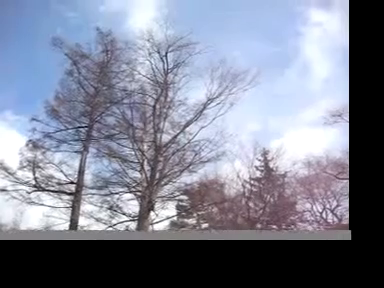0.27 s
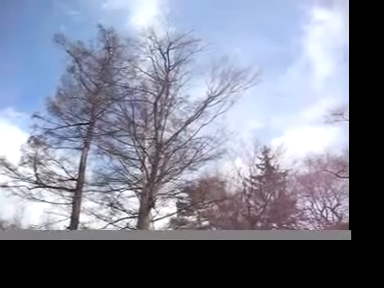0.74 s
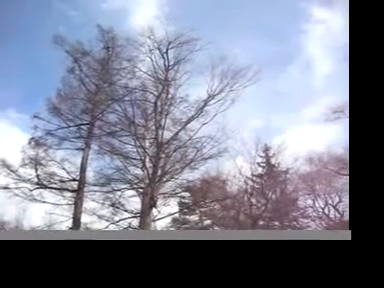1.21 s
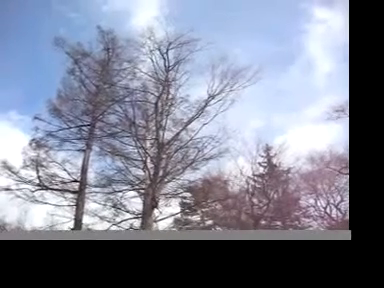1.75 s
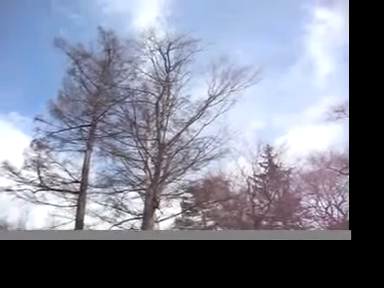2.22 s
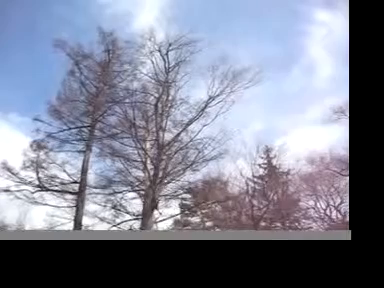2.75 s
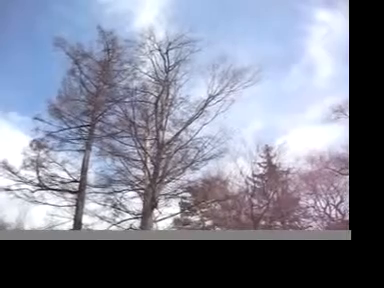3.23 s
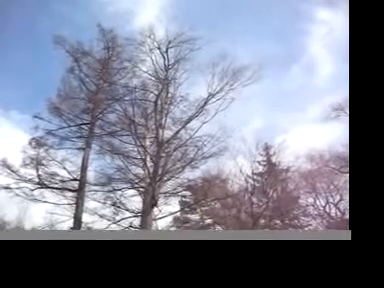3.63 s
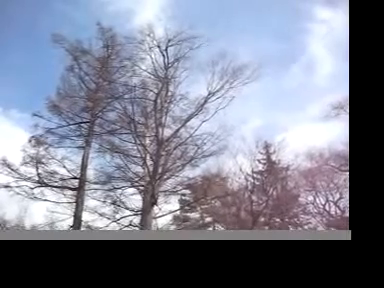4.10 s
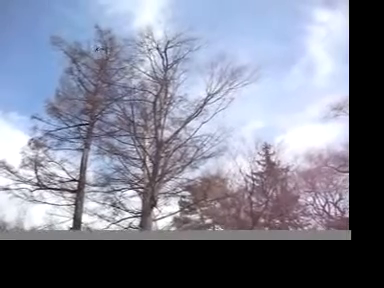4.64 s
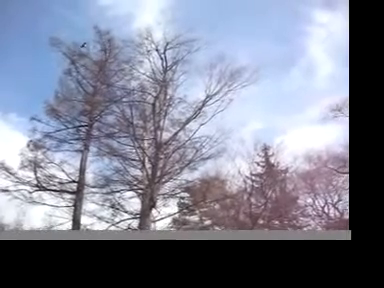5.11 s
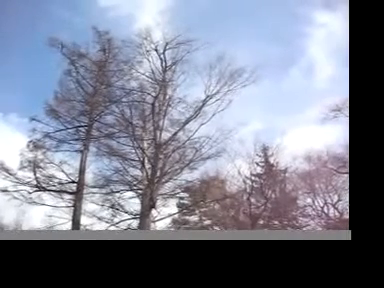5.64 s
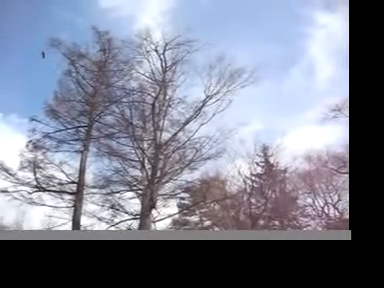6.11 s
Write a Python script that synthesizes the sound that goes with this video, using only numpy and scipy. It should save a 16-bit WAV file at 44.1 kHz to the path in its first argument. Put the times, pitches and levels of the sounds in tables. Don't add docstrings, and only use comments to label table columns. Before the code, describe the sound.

A bird of prey gives a rising whistle that slides down into a quickening, wavering trill, amid wind thumps and small birds chirping in far trees.

```python
import sys
import numpy as np
from scipy import signal
from scipy.fft import rfft, irfft, next_fast_len
from scipy.io import wavfile
from scipy.ndimage import uniform_filter1d

SR = 44100
rng = np.random.default_rng(int(sys.argv[2]) if len(sys.argv) > 2 else 0)


def nominal_scale(level):
    x = np.asarray(level, float) / 20
    return 10 ** x


def inscribe(sig):
    pcm = np.round(np.clip(np.atleast_2d(sig).T, -1, 1) * 32767)
    wavfile.write(sys.argv[1], SR, pcm.astype(np.int16))


N = 280784


def evened(x):
    return x / np.sqrt(np.mean(x ** 2) + 1e-20)


def read(points, hz):
    point_hz, value = np.transpose(points)
    return np.interp(np.log(hz + 1), np.log(point_hz + 1), value)


def curve(points):
    return np.interp(np.arange(N) / SR, *np.transpose(points))


def colour(x, points):
    size = next_fast_len(N + 4096)
    gain = nominal_scale(read(points, np.fft.rfftfreq(size, 1 / SR)))
    return irfft(rfft(x, size) * gain, size)[:N]


def coloured_noise(points):
    return evened(colour(rng.standard_normal(N), points))


def add(mix, s, sound):
    part = mix[round(s * SR):][:len(sound)]
    part += sound[:len(part)]


def flutter(count, smooth_s):
    span = max(int(smooth_s * SR), 2)
    rough = rng.standard_normal(count)
    return evened(uniform_filter1d(uniform_filter1d(rough, span), span))


def swells(rest_db, rows):
    t = np.arange(N) / SR
    power = sum(nominal_scale(db) ** 2 * np.exp(-((t - s) / width) ** 2) for s, width, db in rows)
    return np.sqrt(nominal_scale(rest_db) ** 2 + power)


# (time [s], level [dB])
TOWN_LEVEL = [(0, -48), (.7, -45.5), (2.4, -43.5), (3.3, -45), (6.37, -45)]
# (frequency [Hz], level [dB])
TOWN_SPECTRUM = [(60, 2), (200, 5.5), (480, .5), (990, -.5), (1400, -6.5), (1940, -10.5), (3000, -10.5),
                 (4900, -14)]


def town():
    level_db = curve(TOWN_LEVEL) + 5.5 + 0.36 * flutter(N, 0.22)
    return coloured_noise(TOWN_SPECTRUM) * nominal_scale(level_db)


def whine():
    whine_hz, frame_hz, whine_db = 2773.9, 30.1, -52.5
    t = np.arange(N) / SR
    frame = 2 * np.pi * frame_hz * t
    tug = .7 * np.sin(frame) + .3 * np.sin(2 * frame) + .15 * np.sin(3 * frame)
    level = np.sqrt(2) * nominal_scale(whine_db) * (1 - .22 * np.cos(frame))
    return level * np.sin(2 * np.pi * whine_hz * t + tug)


# (time [s], peak level [dB], frequency [Hz])
COVER_FLAPS = [
    (.533, -15.5, 169),
    (2.864, -21.5, 193),
    (3.328, -17, 216),
    (3.395, -16.5, 184),
]


def flaps():
    t = np.arange(N) / SR
    out = np.zeros(N)
    for s, db, hz in COVER_FLAPS:
        bell = np.exp(-((t - s) * hz / 1.04) ** 2)
        out += nominal_scale(db) * bell * np.sin(2 * np.pi * hz * (t - s))
    return out


def puff(db, hz, lean):
    cycles = np.arange(-1500, 1500) / SR * hz
    swing = np.exp(-(cycles / .58) ** 2) * np.sin(lean - 2 * np.pi * cycles)
    snap = np.exp(-(cycles / 0.26) ** 2) * np.sin(lean - 2 * np.pi * 2.12 * cycles)
    shove = np.exp(-(cycles / 1.6) ** 2) * np.sin(lean - 2 * np.pi * 0.53 * cycles)
    snap_db = -11 + .5 * (db + 19.5)
    return nominal_scale(db - 3.0) * (swing + nominal_scale(snap_db) * snap + nominal_scale(-11.5) * shove)


# (time [s], peak level [dB], frequency [Hz])
WIND_PUFFS = [(.344, -23.5, 86), (.389, -17, 98), (.41, -26, 69), (.494, -24, 79), (.541, -10.5, 95),
              (.569, -18.5, 110), (.816, -23.5, 95), (.995, -23.5, 96), (1.153, -21.5, 76),
              (1.239, -20.5, 86), (1.291, -16, 81.5), (1.312, -19, 119), (1.632, -21.5, 97),
              (2.819, -18, 97), (2.863, -20.5, 165), (2.925, -17, 74.4), (3.04, -20, 86), (3.134, -25, 98),
              (3.28, -15.5, 131), (3.297, -17, 130), (3.322, -18, 110), (3.34, -20, 89.7),
              (3.36, -26, 68.6), (3.386, -15.5, 100), (3.425, -20.5, 65), (3.477, -21.4, 79),
              (3.492, -15, 85), (3.517, -17, 94), (3.581, -16.5, 107), (4.292, -23, 79)]
# (time of peak [s], half width [s], level [dB])
WIND_GUSTS = [
    (.47, 0.18, -34.5),
    (1.15, 0.49, -40),
    (1.65, 0.11, -37.5),
    (2.9, 0.31, -34),
    (3.45, 0.12, -32),
    (4.15, 0.16, -41.5),
]
# (frequency [Hz], level [dB])
WIND_SPECTRUM = [(15, -31), (30, -8), (70, 1.5), (100, -4.5), (135, -5), (200, -13.5), (320, -26.5),
                 (600, -78)]


def wind():
    lumps = swells(-40.5, WIND_GUSTS) * nominal_scale(1.3 * flutter(N, 0.033))
    out = coloured_noise(WIND_SPECTRUM) * lumps + flaps()
    leans = rng.uniform(0.088, 1.42, len(WIND_PUFFS))
    for (s, db, hz), lean in zip(WIND_PUFFS, leans):
        add(out, s - 1500 / SR, puff(db, hz, lean))
    return .36 * np.tanh(out / .36)


# (time of peak [s], half width [s], level [dB])
FLOCK_SWELLS = [
    (.62, .08, -58),
    (.84, 0.088, -52.5),
    (1.3, .1, -52),
    (1.65, 0.19, -53.5),
    (3.3, 0.69, -61.5),
    (4.45, 0.28, -62),
    (4.9, 0.094, -52),
    (5.6, .15, -64),
]
# (frequency [Hz], level [dB])
FLOCK_SPECTRUM = [(3000, -41), (3800, -8), (4400, -2), (4900, -4), (5300, -7), (6000, -37)]


def flock():
    return coloured_noise(FLOCK_SPECTRUM) * swells(-76, FLOCK_SWELLS) * nominal_scale(1.7 * flutter(N, 0.012))


# (time [s], length [s], start pitch [Hz], end pitch [Hz], level [dB])
FALLING = [
    (0.736, .068, 5000, 3020, -47),
    (.759, .043, 4909, 4100, -53),
    (0.954, .03, 4500, 3700, -49),
    (1.426, 0.088, 5100, 3200, -43),
    (1.662, .04, 4500, 3640, -53),
    (2.18, .08, 5300, 4250, -49),
    (5.546, .08, 5100, 3480, -45.5),
    (5.8, 0.066, 4080, 3500, -53),
]
# (time [s], length [s], start pitch [Hz], end pitch [Hz], level [dB])
RISING = [
    (.979, .022, 4000, 4270, -50),
    (1.18, .045, 3050, 3950, -58),
    (4.201, 0.064, 3100, 4490, -45),
    (4.535, 0.062, 3100, 4420, -45),
    (4.815, .055, 2750, 4700, -54),
    (5.337, .08, 3050, 4270, -50),
]
# (time [s], length [s], start pitch [Hz], end pitch [Hz], level [dB])
HOOKED = [
    (1.216, .065, 3800, 4890, -49),
    (1.847, .05, 3950, 4890, -48),
    (2.305, .06, 4270, 4880, -48),
    (3.789, .078, 3480, 4320, -51),
    (4.855, .035, 4750, 5150, -57),
    (5.955, .06, 3500, 2950, -52),
]
# (time [s], length [s], pitch [Hz], level [dB])
LEVEL_NOTES = [
    (0.042, 0.065, 2660, -59),
    (0.29, .064, 2670, -54),
    (0.443, .059, 2700, -52),
    (2.685, .03, 2987, -45),
    (2.718, .043, 3350, -53),
    (4.97, 0.041, 5030, -52),
    (6.348, .018, 5130, -52),
]
# (time [s], level [dB])
HIGH_PIPS = [
    (.701, -49.5),
    (1.401, -47),
    (5.523, -52),
]
# (time [s], pitch [Hz], level [dB])
NEAR_TICKS = [
    (3.633, 4150, -43.5),
    (3.664, 5330, -47),
    (3.672, 4130, -42),
    (3.71, 4100, -48),
    (3.75, 4050, -57),
    (3.895, 2250, -48.5),
    (4.098, 4160, -46),
    (4.112, 3740, -51),
    (4.339, 4050, -49),
]


def chirps():
    notes = [(*row, -0.585, -10) for row in FALLING]
    notes += [(*row, 0.048, -1) for row in RISING]
    for s, length, start_hz, end_hz, db in HOOKED:
        notes.append((s, length, start_hz, end_hz, db, 1.49, 0))
        notes.append((s + .85 * length, 0.088, end_hz, end_hz, db, 1, -7.5))
    notes += [(s, length, hz, hz, db, 1, 0) for s, length, hz, db in LEVEL_NOTES]
    notes += [(s, 0.029, 5180, 4750, db, -1.9, 0) for s, db in HIGH_PIPS]
    notes += [(s, 0.011, hz, hz * (1 - 0.067), db, 1, 0) for s, hz, db in NEAR_TICKS]
    return notes


def small_birds():
    dry, sent = np.zeros((2, N))
    quaver = flutter(N + SR, 0.0022)
    for s, length, start_hz, end_hz, db, bend, fade_db in chirps():
        u = np.linspace(0, 1, int(length * SR))
        glide = np.expm1(-bend * u) / np.expm1(-bend)
        hz = start_hz + (end_hz - start_hz) * glide
        hz = hz * (1 + .005 * quaver[round(s * SR):][:len(u)])
        level = np.sqrt(2) * nominal_scale(db + fade_db * u) * signal.windows.tukey(len(u), .3)
        chirp = level * np.sin(2 * np.pi * np.cumsum(hz) / SR)
        add(dry, s, chirp)
        add(sent, s, chirp * (.35 if length < .016 else 1))
    grain = nominal_scale(2.6 * flutter(N, .004) - .7)
    return dry * grain, sent * grain


# (frequency [Hz], time to fall 60 dB [s])
TREE_DECAY = [(2000, 1.1), (3000, .65), (5000, .5)]


def echoes(x, first_s):
    taps = np.zeros(SR)
    at = np.arange(200, SR - 20, 20)
    taps[at + rng.integers(0, 20, len(at))] = rng.choice([-1., 1.], len(at))
    taps *= np.clip(np.arange(SR) / SR / first_s, 0, 1)
    hz, t, bands = signal.stft(taps, SR, nperseg=256)
    decay = nominal_scale(-60 * t / read(TREE_DECAY, hz)[:, None])
    tail = signal.istft(bands * decay, SR, nperseg=256)[1]
    return signal.fftconvolve(x, tail / np.linalg.norm(tail))[:N]


# (time [s], level [dB])
RASP_LEVEL = [(1.88, -68), (1.92, -50), (1.98, -64), (2.8, -59), (3.45, -52), (3.55, -64)]


def voice(t, hz, tone_db, overtone_db):
    smooth_s = (.003, .006, .005, .02, .004)
    jitter, tone_sway, overtone_sway, rasp_sway, rasp = (flutter(N, s)[:len(t)] for s in smooth_s)
    turn = 2 * np.pi * np.cumsum(hz * (1 + 0.00193 * jitter)) / SR
    rasp_db = np.interp(t, *np.transpose(RASP_LEVEL)) + 3.5 * rasp_sway
    tone = nominal_scale(tone_db + 1.6 * tone_sway - 0.06) * np.sin(turn)
    overtone = nominal_scale(overtone_db + 2.97 * overtone_sway - 1.0) * np.sin(2 * turn)
    hoarse = nominal_scale(rasp_db) * (1 + .5 * rasp) * np.sin(3 * turn / 2)
    edge = np.clip(np.minimum(t - t[0], t[-1] - t) / .002, 0, 1)
    return np.sqrt(2) * (tone + overtone + hoarse) * edge


# (time of crest [s], crest pitch [Hz], trough pitch [Hz], effort [dB], overtone [dB])
TRILL_SHAPE = [
    (2.288, 2122, 2020, -3.7, -0.5),
    (2.58, 2180, 1970, -1.5, -4),
    (2.76, 2261, 2004, -2, -1.5),
    (3.0, 2323, 2072, -1, -0.5),
    (3.22, 2344, 2176, 0, 4),
    (3.474, 2400, 2344, 0.5, 2.5),
    (3.53, 2335, 2242, -1, -1),
]
TRILL_CRESTS = [2.288, 2.386, 2.467, 2.554, 2.642, 2.734, 2.82, 2.909, 2.998, 3.076, 3.144, 3.219, 3.284,
                3.35, 3.416, 3.472, 3.53]


def trill_controls(start_s, start_hz):
    end_s = 3.558
    t = np.arange(start_s, end_s, 1 / SR)
    crests = [2 * start_s - TRILL_CRESTS[0], *TRILL_CRESTS, 2 * end_s - TRILL_CRESTS[-1]]
    turns = np.interp(t, crests, np.arange(len(crests)))
    s, *columns = np.transpose(TRILL_SHAPE)
    crest_hz, trough_hz, effort_db, overtone_db = (np.interp(t, s, c) for c in columns)
    trough_hz = np.where(t < TRILL_CRESTS[0], 2 * start_hz - crest_hz, trough_hz)
    hz = trough_hz + (crest_hz - trough_hz) * (1 + np.cos(2 * np.pi * turns)) / 2
    return t, [hz, effort_db, overtone_db]


# (time [s], level [dB])
BREATH_LEVEL = [(1.7, -26), (2.0, -13), (3.1, -8.5), (3.5, -15)]
# (frequency [Hz], level [dB])
BREATH_SPECTRUM = [(2200, -34), (2700, 1), (3100, 0.5), (3600, -11.5), (4200, -2), (5300, -4.5),
                   (6000, -23)]


def breath(call):
    effort = np.sqrt(abs(uniform_filter1d(call ** 2, 3500)))
    return nominal_scale(curve(BREATH_LEVEL)) * effort * coloured_noise(BREATH_SPECTRUM)


# (time [s], pitch [Hz], effort [dB], overtone [dB])
WHISTLE_REGISTERS = [
    [(1.693, 2137, -3, -10), (1.719, 2330, 1, 3), (1.744, 2497, -5, -1), (1.752, 2550, -2, -8)],
    [(1.744, 2898, 0.5, -2), (1.814, 2860, -0.5, 0), (1.842, 2820, -5, -11), (1.885, 2730, -6, -5)],
    [(1.883, 2266, 2, -5), (1.895, 2224, 2, -6), (1.94, 2210, 0, -1.5), (1.99, 2130, -1, -7),
     (2.141, 2160, -2, -5.5), (2.153, 2098, 3.5, -1), (2.27, 2049, -5, 2.3)],
]
# (pitch [Hz], level [dB])
TONE_RESPONSE = [(1980, -38), (2045, -43.5), (2160, -42.5), (2250, -39), (2345, -31), (2430, -37.5),
                 (2530, -25.5), (2890, -31.5)]
# (pitch of the tone [Hz], level [dB])
OVERTONE_RESPONSE = [(1980, -42), (2060, -42), (2170, -39), (2300, -46), (2400, -47), (2550, -46),
                     (2890, -45.5)]


def raptor():
    out = np.zeros(N)
    for register, rows in enumerate(WHISTLE_REGISTERS):
        s, *columns = np.transpose(rows)
        t = np.arange(s[0], s[-1], 1 / SR)
        controls = [np.interp(t, s, c) for c in columns]
        if register == len(WHISTLE_REGISTERS) - 1:
            trill_t, trill = trill_controls(*rows[-1][:2])
            t = np.append(t, trill_t)
            controls = [np.append(a, b) for a, b in zip(controls, trill)]
        hz, effort_db, overtone_db = controls
        catch_db = -14 * np.exp(-((t - 2.147) / .006) ** 2)
        tone_db = read(TONE_RESPONSE, hz) + effort_db + catch_db
        overtone_db = read(OVERTONE_RESPONSE, hz) + overtone_db + catch_db
        add(out, s[0], voice(t, hz, tone_db, overtone_db))
    return out


def scene():
    near_wet_db, far_wet_db = -12, -2
    background = town() + whine() + wind() + flock()
    far, sent = small_birds()
    far = far + nominal_scale(far_wet_db) * echoes(sent, 0.014)
    near = raptor()
    near = near + breath(near)
    near = near + nominal_scale(near_wet_db) * echoes(near, 0.012)
    return (background + far + near)[None]


def step_hiss(x, db, smooth_s):
    slope = np.sqrt(abs(uniform_filter1d(np.gradient(x) ** 2, int(smooth_s * SR))))
    return x + nominal_scale(db) * slope * rng.standard_normal(N)


def top_cut(x):
    return signal.sosfilt(signal.butter(12, 15840, fs=SR, output="sos"), x)


# (frequency [Hz], level [dB])
INPUT_FILTER = [(4800, 0), (5500, -2), (6200, -6), (7500, -40), (9000, -90)]
# (frequency [Hz], level [dB])
OUTPUT_FILTER = [(4700, 0.5), (5200, -2.5), (5600, -8), (6000, -24.5), (6400, -48.5), (7000, -91)]


def record(dry):
    coarse = 4
    x = step_hiss(colour(dry[0], INPUT_FILTER), -11.5, 0.0025)
    kept = coarse * x * (np.arange(N) % coarse == 0)
    x = step_hiss(colour(kept, OUTPUT_FILTER), -20, 0.0015)
    mix = (x - .0078)[None]
    return top_cut(mix)


dry = scene()
out = record(dry)
inscribe(out)
```